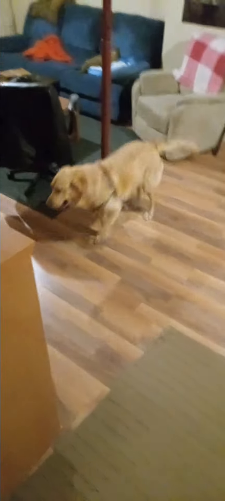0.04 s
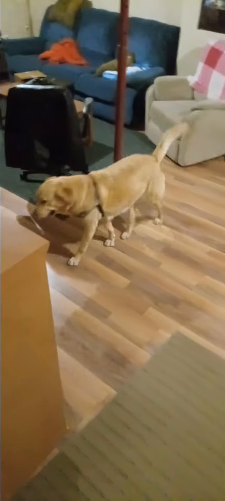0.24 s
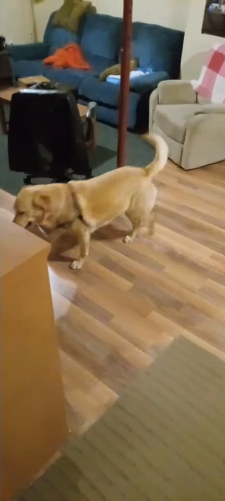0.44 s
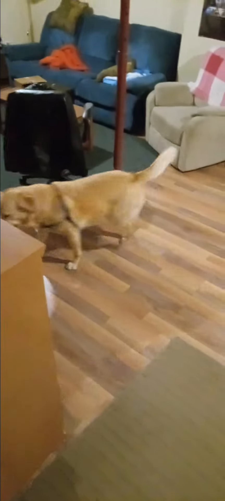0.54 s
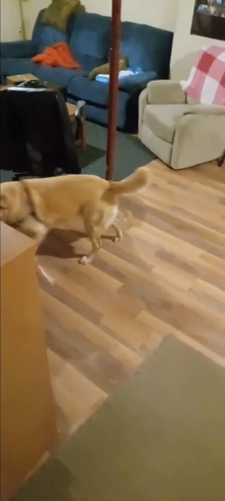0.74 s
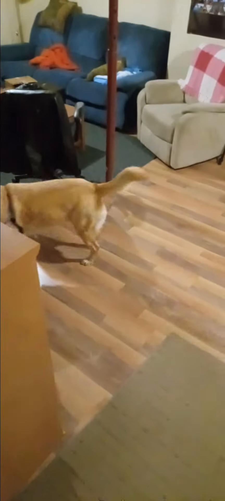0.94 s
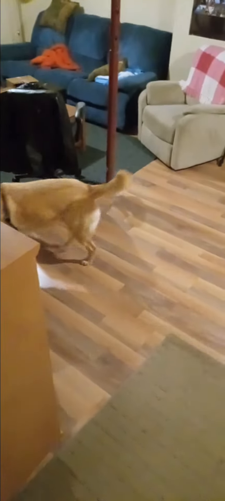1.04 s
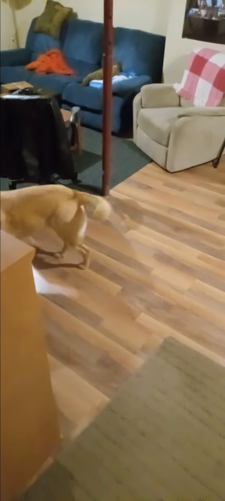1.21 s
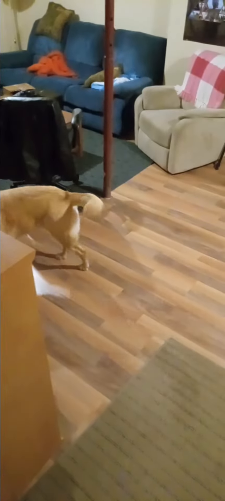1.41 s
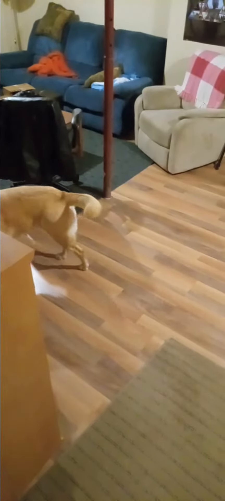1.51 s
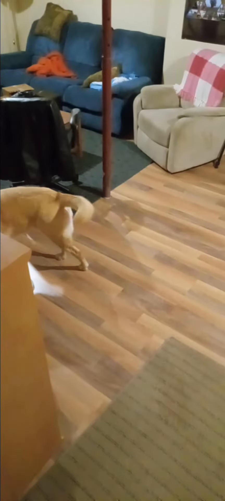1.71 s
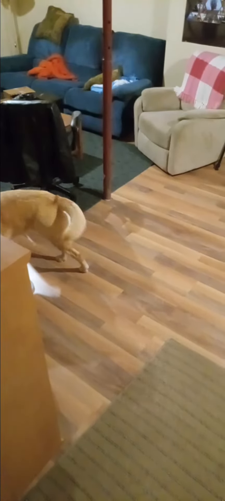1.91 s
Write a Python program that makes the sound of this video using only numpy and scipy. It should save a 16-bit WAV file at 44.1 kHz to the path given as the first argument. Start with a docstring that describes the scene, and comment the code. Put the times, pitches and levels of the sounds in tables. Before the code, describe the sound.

A dog walks on a wooden floor: a few crisp, uneven claw clicks, then a dull hollow knock with low thumps, a brief hiss and a small creak, in a quiet, lightly echoing furnished room.

```python
"""In a furnished room with a wooden floor, a dog walks over the boards.
Its claws snap in short bursts of tiny contacts, which set damped modes of claw and board ringing.
A duller knock, shaped noise with hollow wooden modes, has a hissing wash; the wash and creaks are filtered noise.
Soft, deep thumps are low floor modes. Decaying noise gives the room's answer to claws, knocks and creaks.
Beneath lie a slowly swelling low rumble and faint hiss, both filtered noise, and a mains hum of sines."""
import sys
import numpy as np
from scipy import signal
from scipy.fft import rfft, irfft, next_fast_len
from scipy.io import wavfile

SR = 44100
rng = np.random.default_rng(int(sys.argv[2]) if len(sys.argv) > 2 else 0)


def to_wav(s):
    """Save 16-bit WAV."""
    ch = np.atleast_2d(s).T  # columns
    pcm = np.round(np.clip(ch, -1, 1) * 32767)  # PCM
    wavfile.write(sys.argv[1], SR, pcm.astype(np.int16))


N = 85995


def amp(db):
    """Level law: decibels become an amplitude ratio."""
    return 10 ** (np.asarray(db) / 20)


def along(points, hz):
    """Logarithmic frequency scale: (f/Hz, value) points are interpolated along it."""
    f, value = np.transpose(points)
    return np.interp(np.log(hz + 1), np.log(f + 1), value)


def clock():
    """Time base: half a second, the life of one contact."""
    return np.arange(SR // 2) / SR


def hit(x):
    """Energy normalisation: a hit gets the energy of 10 ms at rms 1."""
    return x * np.sqrt(SR / 100 / (np.sum(x ** 2) + 1e-20))


def add(out, start_s, x):
    """Superposition: x is summed into out from start_s, cut off at both ends of the scene."""
    i = round(start_s * SR)
    x, i = x[max(0, -i):], max(0, i)
    out[i:i + len(x)] += x[:max(0, N - i)]


def coloured(x, points):
    """Minimum-phase filtering: a folded cepstrum turns (f/Hz, level/dB) points into a causal filter."""
    m = 2 * next_fast_len(len(x))
    gain = amp(along(points, np.fft.rfftfreq(m, 1 / SR)))
    cepstrum = irfft(np.log(gain), m)
    cepstrum[1:m // 2] *= 2
    cepstrum[m // 2 + 1:] = 0
    response = np.exp(rfft(cepstrum))
    return irfft(rfft(x, m) * response, m)[:len(x)]


def noise(spectrum):
    """Stationary random noise: a shaped spectrum, scaled to rms 1."""
    x = coloured(rng.standard_normal(N + SR), spectrum)[SR:]  # the filter's onset is dropped
    return x / x.std()


# spectrum of the low room rumble: f/Hz, level/dB
RUMBLE_SPECTRUM = [(20, -8.5), (50, -12), (70, 0), (100, -6), (140, 0.5), (180, -5.5), (230, -19.5),
                   (350, -30), (1000, -47.5), (4000, -97)]
# slow swell of the rumble: t/s, level/dB
RUMBLE_SWELL = [(0, -64), (.2, -60), (.35, -66.5), (.72, -64.5), (.85, -62), (1.25, -62.5), (1.6, -62),
                (1.95, -58.5)]
# spectrum of the faint hiss: f/Hz, level/dB
HISS_SPECTRUM = [(100, 3), (500, -1), (1200, -4), (2300, -4.5), (3500, -15), (6500, -17.5), (8500, -27),
                 (12500, -38), (15000, -24.5)]
HISS_DB = -72.5
# mains hum components: f/Hz, level/dB (rms)
HUM_TONES = [(119.6, -65.5), (360, -96.5), (479, -83)]


def background():
    """Incoherent sources: a swelling low rumble, steady hiss and sinusoidal mains hum add together."""
    t = np.arange(N) / SR
    hum = np.zeros(N)
    for hz, db in HUM_TONES:
        phase = rng.random()  # in turns
        hum += amp(db) * np.sqrt(2) * np.sin(2 * np.pi * (hz * t + phase))
    swell = amp(np.interp(t, *np.transpose(RUMBLE_SWELL)))
    return swell * noise(RUMBLE_SPECTRUM) + amp(HISS_DB) * noise(HISS_SPECTRUM) + hum


# reverberation time of each band: f/Hz, t60/s (before the tail length ratio)
ROOM_T60 = [(150, .22), (700, .15), (1500, .18), (4000, 0.25), (6500, 0.22), (9000, 0.14), (15000, 0.15)]
# spectral colour of the echoes: f/Hz, level/dB
ROOM_COLOUR = [(150, 4.5), (700, 1), (1400, 3), (2400, 6.5), (4000, 2), (5500, -1.5), (7000, -8.5),
               (9000, -5.5), (15000, -7)]
ROOM_DELAY_S = .005  # middle of the fade-in of the reflections
ROOM_HOLD_S, HOLD_DB_PER_S = 0.036, 66.5  # dense early echoes and their slow fall, before the length ratio
ROOM_BEND = 1.417  # above 1 the tail falls ever faster


def room(x, stretch=1):
    """Reverberation: dense early echoes fall slowly, then each band dies at its own speed."""
    hz, t, bands = signal.stft(rng.standard_normal(len(x)), SR, nperseg=256)
    t = t / stretch
    late = np.maximum(t - ROOM_HOLD_S, 0) / along(ROOM_T60, hz)[:, None]
    fall_db = HOLD_DB_PER_S * np.minimum(t, ROOM_HOLD_S) + 60 * late ** ROOM_BEND
    tail = signal.istft(bands * amp(-fall_db), SR, nperseg=256)[1][:len(x)]
    tail = tail * np.clip(clock() / ROOM_DELAY_S - .5, 0, 1)
    response = coloured(tail / np.linalg.norm(tail), ROOM_COLOUR)
    return signal.fftconvolve(x, response)[:len(x)]


GRAIN = 1.59  # exponent on the noise: above 1 a contact is spikier


def contact(length, spectrum, edge):
    """Gated random noise: a spiky burst, like many tiny impacts, takes on the given spectrum."""
    t = clock()
    z = rng.standard_normal(len(t))
    grains = np.sign(z) * np.abs(z) ** GRAIN
    rise = 1 - np.exp(-t / edge)
    release = np.exp(-np.maximum(t - length, 0) / edge)
    return hit(coloured(grains * rise * release, spectrum))


def ringing(modes, pitch, rise):
    """Modal superposition: exponentially damped sines, their balance a little different at each blow."""
    t = clock()
    ring = np.zeros(len(t))
    for f, db, t60 in modes:
        decay = amp(db + rng.normal(0, 1) - 60 * t / t60)
        ring += decay * np.sin(2 * np.pi * pitch * f * t)
    return hit(ring * (1 - np.exp(-t / rise)))


# soft thumps: t/s, level/dB
THUMPS = [(0.833, -57), (1.236, -53.5), (1.305, -32), (1.343, -31), (1.394, -38)]
# floor modes: f/Hz (before the pitch ratio), level/dB, t60/s
JOIST_MODES = [(111, 6, .2), (82.5, -22.5, 0.45), (131.8, 5, 0.12), (154.3, -8, 0.42), (195.5, 0.5, 0.12),
               (264.5, -4.5, 0.1), (302, -11, 0.13), (367.4, -13, 0.11), (454.4, -7, 0.062)]
JOIST_PITCH, THUMP_RISE_S = 0.94, 0.0086  # pitch ratio; time constant of the onset


def thumps():
    """Low-order floor resonance: weight lands softly and the floor booms."""
    out = np.zeros(N)
    for start_s, db in THUMPS:
        add(out, start_s, amp(db) * ringing(JOIST_MODES, JOIST_PITCH, rise=THUMP_RISE_S))
    return out


# smooth, broadband hissing wash following the knock: t/s, level/dB, length/s
KNOCK_WASH = [(1.303, -39, 0.045), (1.343, -51, 0.057)]
# spectrum of the wash: f/Hz, level/dB
WASH_SPECTRUM = [(100, -9), (300, 8.5), (700, 14), (1500, -4.5), (3000, 7.5), (4200, -1.5), (5200, -8.5),
                 (6400, -4.5), (8000, -18.5), (10000, -25), (13000, -44), (15500, -29)]
# rough, squeaky creaks: t/s, level/dB, length/s
CREAKS = [(1.314, -38.5, .015), (1.354, -47.5, 0.078), (1.448, -54, 0.033), (1.497, -67.5, 0.017)]
# narrow spectrum of a creak: f/Hz, level/dB
CREAK_SPECTRUM = [(300, -49), (800, -1), (1500, -25.5), (1900, -13), (2090, 9.5), (2160, 0.5), (2290, -0.5),
                  (2520, -17), (4000, -52), (9000, -71)]
WASH_EDGE_S, CREAK_EDGE_S = 0.004, .005  # time constants of rise and release
CREAK_ROOM_DB = -19


def wash_and_creaks():
    """Shaped noise: a knock's hissing wash, and narrow, rough creaks with a faint room answer."""
    out = np.zeros(N)
    for start_s, db, length in KNOCK_WASH:
        add(out, start_s, amp(db) * contact(length, WASH_SPECTRUM, WASH_EDGE_S))
    for start_s, db, length in CREAKS:
        creak = contact(length, CREAK_SPECTRUM, CREAK_EDGE_S)
        add(out, start_s, amp(db) * (creak + amp(CREAK_ROOM_DB) * room(creak)))
    return out


# dull knocks: t/s, level/dB, length/s, room level/dB
KNOCKS = [(1.2915, -33.5, 0.0083, -4), (1.384, -50, 0.0022, -9)]
# spectrum of the knock contact: f/Hz, level/dB
KNOCK_SPECTRUM = [(100, -15), (350, -26), (540, 5.5), (800, -13), (1000, -4), (1230, 2.5), (1480, 0.5),
                  (1750, -1), (2200, 0.5), (2750, -7), (3450, -11), (4200, -22.5), (6500, -32), (9000, -35),
                  (13000, -71), (15500, -59.5)]
# modes of the hollow wood: f/Hz, level/dB, t60/s
KNOCK_MODES = [(529, -10.5, 0.072), (585.6, -3.5, 0.069), (818, -10, 0.1), (1208, 2, 0.044),
               (1330, 1, 0.031), (1761, -5, 0.065)]
KNOCK_RISE_S, KNOCK_RING_DB = 0.005, -7.5


def knocks():
    """Impact excitation: a dull contact sets the modes of hollow wood ringing."""
    out = np.zeros(N)
    for start_s, db, length, room_db in KNOCKS:
        blow = contact(length, KNOCK_SPECTRUM, KNOCK_RISE_S)
        ring = ringing(KNOCK_MODES, 1, rise=KNOCK_RISE_S)
        knock = blow + amp(KNOCK_RING_DB) * ring
        add(out, start_s, amp(db) * (knock + amp(room_db) * room(knock)))
    return out


# spectrum of a claw contact: f/Hz, level/dB
CLAW_SPECTRUM = [(300, -56), (1000, -43), (1500, -32.5), (2200, -18.5), (3100, -13.5), (4200, -7.5),
                 (5100, -7), (6600, -1.5), (7500, -2.5), (8100, -10.5), (8900, -7), (10200, -22.5),
                 (13000, -37), (15000, -29.5), (16500, -31)]
# claw modes: f/Hz (before the pitch ratio), level/dB, t60/s
CLAW_MODES = [(3053, -10.5, 0.021), (3380, -6, 0.06), (4090, -6, 0.057), (4680, -4, 0.051),
              (5750, 0.5, 0.053), (6420, 4, .04), (7140, -2, 0.09), (7580, -10.5, 0.038)]
# board modes: f/board pitch (ratio), level/dB, t60/s
BOARD_MODES = [(1, -2.5, 0.049), (1.9, -4, 0.036), (2.55, -4.5, .03), (3.5, -2.5, .025)]
# a board radiates little bass: f/Hz, level/dB
BOARD_RADIATION = [(300, -19), (620, 0)]
CLAW_PITCH, CLAW_EDGE_S, BOARD_RISE_S = 0.96, .0007, 0.00061  # pitch ratio; time constants
TILT_HZ = 5575  # pivot between the middle and treble levels of a snap


def click(length, board_db, board_hz, middle_db, treble_db, ring_db):
    """Coupled resonators: a claw snaps on the wood, rings briefly and sets the board beneath it ringing."""
    claw_ring = ringing(CLAW_MODES, CLAW_PITCH, rise=CLAW_EDGE_S)
    snap = contact(length, CLAW_SPECTRUM, CLAW_EDGE_S) + amp(ring_db) * claw_ring
    tilt = [(TILT_HZ / 2, middle_db), (TILT_HZ, 0), (2 * TILT_HZ, treble_db)]
    snap = hit(coloured(snap, tilt))
    board = coloured(ringing(BOARD_MODES, board_hz, rise=BOARD_RISE_S), BOARD_RADIATION)
    return snap + amp(board_db) * board


# claw clicks: t/s, level/dB, contact length/s, board ring level/dB, board pitch f/Hz,
# room level/dB, middle level/dB, treble level/dB, claw ring level/dB, tail length ratio
CLICKS = [(-.085, -50, 0.0052, -31, 750, -1, -4.5, -21.5, -6.5, 0.85),
          (0.2171, -32, 0.0034, -12.5, 834, -1, 1.5, 3, -6, 0.92),
          (0.2212, -33, 0.0037, -12.5, 759, 2, 0, -7, -6.5, 0.94),
          (0.5777, -31.5, 0.0039, -15, 707.4, -1.5, 0.5, 0, -8, 0.84),
          (0.715, -47, 0.0021, -34, 730, 0.5, -3.5, -3.5, -9, 0.56),
          (0.9778, -45.5, 0.0037, -24, 690, -1.5, 0, -19, 2.5, 0.67),
          (1.0063, -40.5, 0.0082, -16, 701, 2.5, 7, -3, -8, 0.8),
          (1.0153, -42, 0.0031, -8, 678, -1, 5.5, -2, -2, 0.38)]
BRUSH_DB, BRUSH_S = -21.5, 0.0064  # the paw grazes the wood just before each contact; re the click


def claws(count=2):
    """Direct and reflected sound: each click arrives straight and, drawn afresh, by several echo paths."""
    out = np.zeros(N)
    for start_s, db, length, board_db, board_hz, room_db, middle_db, treble_db, ring_db, stretch in CLICKS:
        shape = length, board_db, board_hz, middle_db, treble_db, ring_db
        echoes = sum(room(click(*shape), stretch) for _ in range(count)) / np.sqrt(count)
        add(out, start_s, amp(db) * (click(*shape) + amp(room_db) * echoes))
        brush = contact(BRUSH_S, CLAW_SPECTRUM, BRUSH_S)
        add(out, start_s - BRUSH_S, amp(db + BRUSH_DB) * brush)
    return out


def scene():
    """Linear superposition: every source sums at one microphone."""
    return (background() + thumps() + wash_and_creaks() + knocks() + claws())[None]


LOW_CUT_HZ, TOP_HZ = 65, 16300
MIC_BASS_DB = -8  # what is left far below the low cut


def record(dry):
    """Band limiting: the small microphone weakens the deepest bass; nothing is kept from TOP_HZ up."""
    m = next_fast_len(N + SR // 2)
    hz = np.fft.rfftfreq(m, 1 / SR)
    low_cut = hz ** 6 / np.sqrt(hz ** 12 + float(LOW_CUT_HZ) ** 12)  # sixth-order Butterworth magnitude
    gain = np.maximum(low_cut, amp(MIC_BASS_DB)) * (hz < TOP_HZ)
    return irfft(rfft(dry, m) * gain, m)[:, :N]


dry = scene()
out = record(dry)
to_wav(out)
```